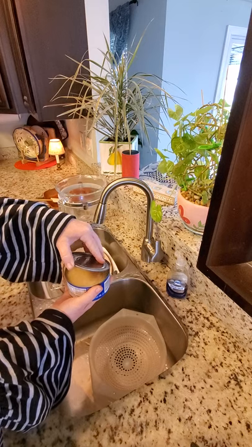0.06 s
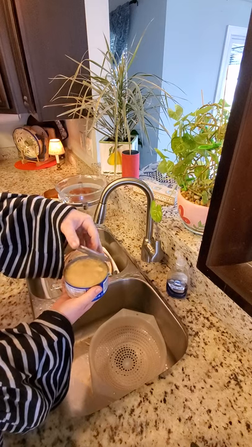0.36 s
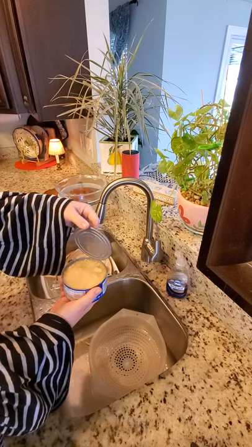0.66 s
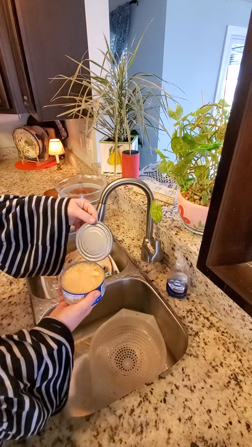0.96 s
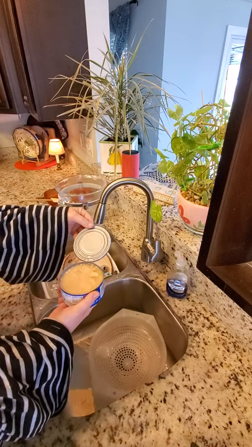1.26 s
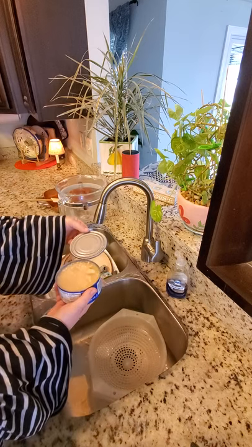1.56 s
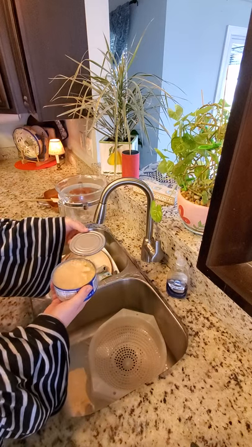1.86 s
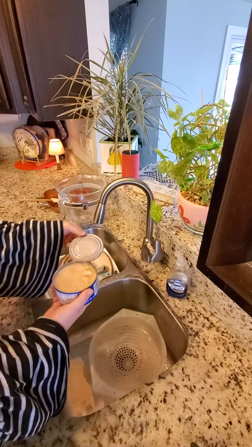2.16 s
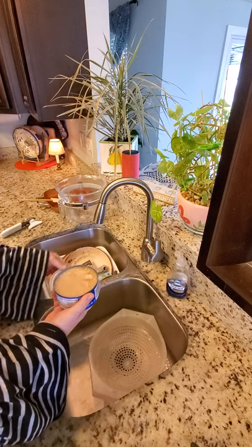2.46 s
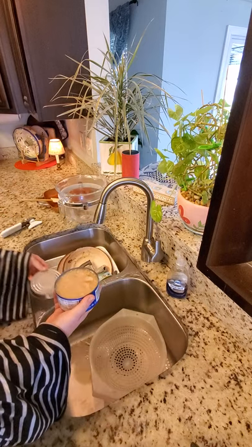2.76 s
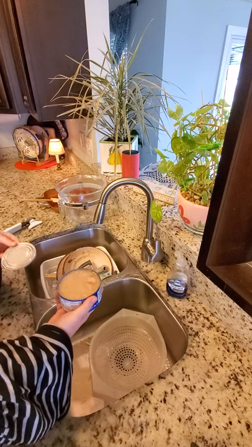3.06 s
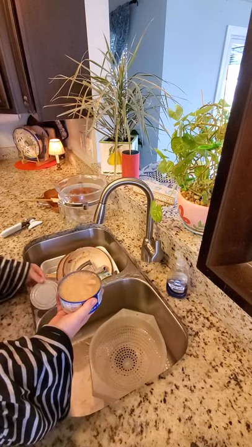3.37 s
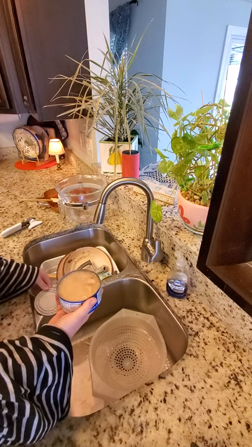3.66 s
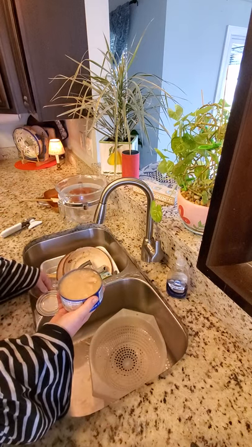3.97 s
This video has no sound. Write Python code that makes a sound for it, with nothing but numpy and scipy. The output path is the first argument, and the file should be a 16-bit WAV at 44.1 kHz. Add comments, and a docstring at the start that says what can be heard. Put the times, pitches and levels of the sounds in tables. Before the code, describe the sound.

A thin metal can lid clinks and rattles briefly into a steel sink.

```python
"""Appliances hum in a quiet kitchen while a thin can lid slides off its can with faint scrapes and ticks.
The scraping is friction noise that gathers at the resonances of the held lid. One hum stops midway.
Lowered into a steel sink, the lid bumps, clinks once and lands with a short rattle: each contact is
a noisy clash of sheet metal over the ringing modes of lid and sink."""
import sys
import numpy as np
from scipy import signal
from scipy.fft import irfft
from scipy.io import wavfile

SR = 44100
rng = np.random.default_rng(int(sys.argv[2]) if len(sys.argv) > 2 else 0)


def store_pcm(level_fs):
    """Save levels as 16-bit WAV."""
    pcm = np.round(np.clip(level_fs, -1, 1) * 32767).astype(np.int16)
    wavfile.write(sys.argv[1], SR, np.atleast_2d(pcm).T)


N = 176400
TOP_HZ = 15900

# Likeness of left and right: freq_hz, correlation
STEREO_LIKENESS = [(60, 1), (150, 0.88), (350, .8), (550, 0.6), (1200, 0), (15000, 0)]
# Kitchen reverb time: freq_hz, t60_s
ROOM_DECAY = [(200, .35), (1500, 0.45), (3000, 0.4), (15000, 0.22)]
# Lid hitting the sink; spot blends from contact point A (0) to B (1), focus is the most excited pitch:
# start_s, ring_db, clash_db, spot, tilt_db_per_octave, focus_hz, focus_lift_db
SINK_HITS = [(3.481, 1, 1, 0.07, -2.5, 1390, 1.5), (3.4941, -14, -16, 0.38, 0, 2300, 6),
             (3.6618, -1, -1.5, 0.87, -1, 1450, 6), (3.6802, -9, -6, 1, 1.5, 4400, -0.5),
             (3.694, -13.5, -5.5, 0.97, 0, 2290, 20.5), (3.711, -17, -11, 0.22, -3, 2320, 16),
             (3.73, -12.5, -14.5, 0.6, -2, 4400, 11.5)]
# Modes of lid and sink: pitch_hz
METAL_PITCHES = [502, 534, 810, 1335, 1438, 1494, 1612, 1685, 1720, 2137, 2388, 2770, 2962, 3016, 3232,
                 3461, 3701, 3765, 4427, 4610, 5202, 5350, 5772, 6148, 6228, 7286, 7383, 9294, 10250, 11650,
                 12488, 14870]
# Stereo lean of the clinks: freq_hz, left_minus_right_db
CLINK_BALANCE = [(200, -0.5), (530, 1), (1500, 3), (2400, 2), (4000, -0.5), (9000, -1.5), (15000, -1.5)]


def amp(db):
    """Decibels to gain."""
    return 10 ** (np.asarray(db) / 20)


def curve(points, hz, column=1):
    """One column of a table, interpolated over log frequency."""
    table = np.array(points, float)
    return np.interp(np.log(hz + 1), np.log(table[:, 0] + 1), table[:, column])


def near(hz, modes_hz, width_hz):
    """1 on a mode, falling towards 0 away from it."""
    distance_hz = abs(hz[:, None] - np.array(modes_hz)).min(1)
    return np.exp(-(distance_hz / width_hz) ** 2)


def bell(hz, centre_hz, octaves):
    """A bell curve over pitch, 1 at its centre."""
    return np.exp(-(np.log2(hz / centre_hz) / octaves) ** 2)


def add(mix, start_s, sound):
    """Mixes in a stereo sound."""
    part = mix[:, round(start_s * SR):][:, :sound.shape[1]]
    part += sound[:, :part.shape[1]]


def pan(db):
    """Left and right gains for a left-minus-right level."""
    return amp(np.array([[db], [-db]]) / 2)


def noise(colour, size):
    """Stereo noise with the spectrum colour(hz) in dB; the bass is nearly mono."""
    hz = np.fft.rfftfreq(size, 1 / SR)
    left, spread = np.exp(2j * np.pi * rng.random((2, len(hz))))
    likeness = np.clip(curve(STEREO_LIKENESS, hz), -1, 1)
    right = likeness * left + np.sqrt(1 - likeness ** 2) * spread
    return irfft(np.array([left, right]) * amp(colour(hz)), size) * np.sqrt(size)


def phase_gap(hz):
    """Radians between left and right, wider for higher tones."""
    return np.arccos(np.clip(curve(STEREO_LIKENESS, hz), -1, 1))


def ring(hz, t60, t):
    """One decaying mode in stereo."""
    return amp(-60 * t / t60) * np.sin(2 * np.pi * hz * t + np.array([[.5], [-.5]]) * phase_gap(hz))


def die_away(x, decay):
    """Lets each band of x fade at its own speed."""
    hz, t, bands = signal.stft(x, SR, nperseg=256)
    bands = bands * amp(-60 * t / curve(decay, hz)[:, None])
    return signal.istft(bands, SR, nperseg=256)[1][:, :x.shape[1]]


def in_room(x, wet_db, size=22050):
    """The sound plus its diffuse kitchen reverb."""
    build_up = np.minimum(np.arange(size) / SR / 0.0078, 1)
    tail = die_away(noise(np.zeros_like, size), ROOM_DECAY) * build_up
    return x + amp(wet_db) * signal.fftconvolve(x, tail / np.linalg.norm(tail[0]), axes=1)[:, :N]


def kitchen_hum(switch_s=1.542, fade_s=0.35):
    """Motors and mains hum over soft air; as one hum stops, some tones sink and others come up."""
    # Tones that run throughout: pitch_hz, level_db
    steady_tones = [(59.2, -73), (81.71, -47.5), (118.4, -72), (147.9, -76.5), (286.1, -75.5), (414.1, -72),
                    (473.3, -75), (651, -82)]
    # Tones that change at the switch: pitch_hz, before_db, after_db
    switched_tones = [(180, -70, -95), (210.4, -73.5, -91.5), (233.1, -70, -86.5), (266.4, -81.5, -73),
                      (325.4, -64, -79.5), (384.4, -82, -72), (503, -93.5, -79), (595, -92.5, -75.5),
                      (627.5, -76.5, -96)]
    # Room air around the switch: freq_hz, before_db, after_db
    air = [(20, -9, -7), (41.7, -5, -8), (87, 3, 4), (124, -6, -11.5), (226, -4, -6.5), (450, -7.5, -9.5),
           (683, -12, -14), (1344, -16.5, -18.5), (2820, -31, -31), (4620, -41.5, -41.5),
           (8000, -54.5, -54), (12200, -47, -47.5), (16000, -44.5, -45.5)]
    t = np.arange(N) / SR
    switched = np.clip((t - switch_s) / fade_s + .5, 0, 1)
    air_before = noise(lambda hz: curve(air, hz), N)
    air_after = noise(lambda hz: curve(air, hz, column=2), N)
    out = amp(-42) * (air_before * np.sqrt(1 - switched) + air_after * np.sqrt(switched))
    for hz, before_db, after_db in [(hz, db, db) for hz, db in steady_tones] + switched_tones:
        waver = signal.resample(rng.standard_normal(24), N) * 0.29 * min(hz / 400, 1) ** 2
        rms = amp(before_db + (after_db - before_db) * switched) * (1 + waver)
        stereo_phase = np.array([[0], [phase_gap(hz) / 2]])
        out += np.sqrt(2) * rms * np.sin(2 * np.pi * (hz * t + rng.random()) + stereo_phase)
    return out * pan(-1.3)


def rim_scrape():
    """The lid drags softly and unevenly along the rim as it comes off."""
    # Swell of the drag: time_s, level_db
    swell = [(0.0, -9), (0.05, -6), (0.12, -7), (0.18, -4), (0.39, -4.5), (0.5, -8), (0.8, -9), (1.0, -19)]
    # Colour of the friction: freq_hz, level_db
    spectrum = [(800, -18), (1800, -3.5), (2900, 5.5), (3600, 1.5), (4300, -4), (6000, -11.5), (8000, -27),
                (16000, -31)]
    grain_db = 2.5 * signal.resample(rng.standard_normal(320), N)
    swell_db = np.interp(np.arange(N) / SR, *np.transpose(swell), right=-100)
    return noise(lambda hz: curve(spectrum, hz), N) * amp(-72 + swell_db + grain_db)


def lid_ticks(size=13230, scrape_t60=0.065):
    """The lid's edge catches on can and fingers; each grip favours and detunes different modes."""
    # Catches of the edge: start_s, level_db, half_rise_s, tilt_db_per_octave, focus_hz, focus_lift_db
    catches = [(.207, -77.5, 0.0047, -6, 4530, 12), (0.226, -77, .005, -7, 3700, 12),
               (0.251, -68.5, .0005, -7.5, 4000, 7), (0.439, -83.5, 0.0062, -10.5, 2670, 9),
               (.571, -75.5, 0.0037, -5.5, 5800, 8), (0.581, -81, 0.016, 1.5, 10000, 6),
               (.622, -83.5, 0.02, -1.5, 9500, 9), (0.665, -75.5, 0.0034, -3, 3100, 8),
               (0.7452, -82.5, .003, -2, 5800, 2), (1.0269, -67.5, .0008, -2.5, 3050, 3.5),
               (1.588, -90, 0.0045, 6, 7600, 19), (1.767, -93, .01, 5, 7360, 10),
               (1.797, -80, 0.012, 3.5, 6400, 8), (1.823, -68, .007, 1, 3070, -1.5),
               (1.974, -84, .005, 2.5, 7800, 19)]
    # Colour of their scraping: freq_hz, level_db
    spectrum = [(500, -12.5), (1400, 7.5), (2000, -4.5), (3000, 0.5), (3700, -11.5), (4500, -14),
                (6500, -15.5), (7600, -18.5), (8600, -23.5), (10000, -7), (12000, -6.5), (15500, -5)]
    # Modes of the lid held in the fingers: pitch_hz, level_db, t60_s
    held_modes = [(3020, -3.5, 0.095), (3600, -16.5, 0.05), (4320, -10, 0.026), (4500, -16, 0.051),
                  (5780, -16.5, 0.052), (6100, -16.5, 0.14), (7350, -13, 0.076), (7840, -17, 0.087),
                  (9280, -8, 0.062), (9950, -10.5, 0.04), (11580, -4.5, 0.14), (12300, -8, .07),
                  (14400, -14, .06)]
    t, out = np.arange(size) / SR, np.zeros((2, N))
    peaks_db = lambda hz: 11.5 * near(hz, [mode[0] for mode in held_modes], width_hz=140)
    for start_s, level_db, half_rise_s, tilt, focus_hz, lift_db in catches:
        def touch_db(hz):
            return tilt * np.log2((hz + 500) / 6000) + lift_db * bell(hz + 1, focus_hz, octaves=.14)

        rise_s = 2 * half_rise_s
        tick = noise(lambda hz: curve(spectrum, hz) + touch_db(hz) + peaks_db(hz), size)
        tick *= amp(5 - 60 * np.maximum(t - rise_s, 0) / scrape_t60)
        for hz, mode_db, t60 in held_modes:
            scatter_db, detune = rng.normal(0, [2, .006])
            hold = amp(-60 * np.maximum(rise_s - t, 0) / t60)  # no decay until the rise ends
            tone = ring(hz * (1 + detune), t60, t - rise_s) * hold
            tick += amp(mode_db + touch_db(hz) + scatter_db) * tone
        add(out, start_s, amp(level_db) * np.minimum(t / rise_s, 1) * tick)
    return in_room(out, wet_db=-7)


def dull_taps(size=13230, rise_s=0.0017):
    """Damped knocks: one broad resonance and a little hiss."""
    # Taps and brushes: start_s, level_db, centre_hz, width_octaves, t60_s, hiss_db
    taps = [(0.2517, -53.5, 1360, 0.3, 0.021, -30), (0.9408, -51, 1440, 0.13, 0.038, -56),
            (3.435, -56, 1380, 0.75, 0.38, -22)]
    t, out = np.arange(size) / SR, np.zeros((2, N))
    for start_s, level_db, centre_hz, width, t60, hiss_db in taps:
        resonance = lambda hz: np.sqrt(bell(hz + 1, centre_hz, width))
        knock = noise(lambda hz: 20 * np.log10(resonance(hz) + amp(hiss_db)), size)
        envelope = amp(level_db - 60 * t / t60) * np.minimum(t / rise_s, 1)
        add(out, start_s, envelope * knock / knock.std())
    return in_room(out, wet_db=-10)


def basin_bump(start_s=3.4375, peak_s=0.0048, size=4410):
    """A soft push on the basin: a few low cycles that swell and die."""
    t, out = np.arange(size) / SR, np.zeros((2, N))
    swell = (t / peak_s * np.exp(1 - t / peak_s)) ** 2
    add(out, start_s, amp(-41) * swell * ring(hz=295, t60=0.91, t=t))
    return in_room(out, wet_db=-10)


def sheet_clash(size=22050, rise_s=0.0012, flex_hz=1447, shimmer_from_hz=3900, count=110):
    """Each hit flexes the lid and sets off a noisy clash with a shimmer of weak upper modes."""
    # Colour of the sheet metal: freq_hz, spot_a_db, spot_b_db
    spectrum = [(100, -34, -20), (185, -18, -3.5), (310, -16.5, -9.5), (500, -10.5, -11), (660, -14.5, -29),
                (1010, -35.5, -23), (1120, -32, -33), (1225, -6, -2.5), (1520, -8.5, -3.5),
                (1705, -5.5, -11.5), (1830, -27, -14), (2270, -28, -27), (2370, -10.5, -2),
                (2830, -15.5, -20.5), (3014, -6.5, -1.5), (3400, -32, -37), (3730, -10, -8.5),
                (3860, -19, -14.5), (4470, -14.5, -16), (4770, -16, -22.5), (5300, -10, -9),
                (5600, -18, -20), (6270, -12, -10), (6450, -15.5, -32), (8600, -13, -20),
                (9700, -15.5, -16), (12300, -10.5, -9.5), (13200, -7, -12), (15500, -7, -12)]
    # Fade of the clash: freq_hz, t60_s
    clash_decay = [(200, 0.14), (1500, 0.18), (4000, 0.2), (15000, 0.04)]
    # Fade of the upper modes: freq_hz, t60_s
    shimmer_decay = [(4000, .24), (7000, 0.27), (15000, 0.11)]
    t, out = np.arange(size) / SR, np.zeros((2, N))
    upper_hz = shimmer_from_hz + (TOP_HZ - shimmer_from_hz) * (np.arange(count) + rng.random(count)) / count
    upper_modes = np.sin(2 * np.pi * (upper_hz[:, None] * t + rng.random((2, count, 1))))
    upper_modes *= amp(-60 * t / curve(shimmer_decay, upper_hz)[:, None])
    upper_db = rng.normal(0, 3, count) - curve(spectrum, upper_hz).mean()
    # The sheet's fine peaks and gaps, shared by all hits
    ripple_hz = np.arange(shimmer_from_hz, TOP_HZ, 70)
    ripple_db = 3 * np.clip(rng.standard_normal(len(ripple_hz)), -2, 1)
    # A few cycles of bending as the edge lands
    flex = amp(-26) * np.exp(-(t / 0.0015 - 2) ** 2) * np.sin(2 * np.pi * flex_hz * t)
    for start_s, _, clash_db, spot, tilt, _, _ in SINK_HITS:
        def sheet_db(hz):
            spot_db = (1 - spot) * curve(spectrum, hz) + spot * curve(spectrum, hz, column=2)
            side_db = np.array([[.5], [-.5]]) * curve(CLINK_BALANCE, hz)
            return spot_db + tilt * np.log2((hz + 100) / 3000) + side_db

        def resonant_db(hz):
            peaks_db = 5 * near(hz, METAL_PITCHES, width_hz=55)
            return sheet_db(hz) + np.interp(hz, ripple_hz, ripple_db, left=0) + peaks_db

        clash = die_away(noise(resonant_db, size), clash_decay)
        clash += amp(-12.5) * die_away(noise(resonant_db, size), ROOM_DECAY)
        shimmer = np.einsum("ck,ckt->ct", amp(sheet_db(upper_hz) + upper_db), upper_modes)
        metal = (amp(-21) * clash + amp(-55.5) * shimmer) * (1 - np.exp(-t / rise_s))
        add(out, start_s, amp(clash_db) * (metal + flex))
    return out


def metal_ring(size=22050, rise_s=0.0024):
    """The strong modes of lid and sink ring on after each hit, weighted by where it lands."""
    # One row for each of METAL_PITCHES: t60_s, spot_a_db, spot_b_db
    modes = [(0.95, -50.5, -76.5), (0.18, -44.5, -34.5), (0.17, -70.5, -45.5), (0.16, -46, -57),
             (0.11, -37.5, -33), (0.35, -37.5, -38.5), (0.12, -37, -53.5), (0.25, -43.5, -54.5),
             (0.37, -61.5, -38.5), (0.14, -61.5, -54), (0.23, -67, -44), (.22, -42, -72), (0.17, -45, -55),
             (0.3, -44, -45.5), (0.15, -68, -64), (0.62, -73, -53), (0.23, -52, -56), (0.13, -51, -41.5),
             (0.27, -64, -50), (.28, -57, -53), (0.17, -62, -50), (0.31, -51, -53), (0.27, -61, -49),
             (0.3, -52, -43), (0.27, -60, -49), (0.29, -50.5, -56.5), (0.12, -54, -65), (0.12, -48, -40),
             (0.26, -54, -52), (0.18, -44.5, -51), (0.15, -58, -38), (0.089, -53, -35)]
    t, out = np.arange(size) / SR, np.zeros((2, N))
    attack = 1 - np.exp(-t / rise_s)
    for start_s, ring_db, _, spot, _, focus_hz, lift_db in SINK_HITS:
        for hz, (t60, a_db, b_db) in zip(METAL_PITCHES, modes):
            spot_db = (1 - spot) * a_db + spot * b_db
            gain = amp(ring_db + spot_db + lift_db * bell(hz, focus_hz, octaves=0.25))
            add(out, start_s, gain * pan(curve(CLINK_BALANCE, hz)) * ring(hz, t60, t) * attack)
    return in_room(out, wet_db=-14)


def scene():
    """Lid, sink and kitchen together."""
    clinks = sheet_clash() + metal_ring()
    return clinks + lid_ticks() + rim_scrape() + dull_taps() + basin_bump() + kitchen_hum()


def record(dry):
    """A steep low-pass trims the highest treble."""
    low_pass = signal.firwin(511, TOP_HZ, window=("kaiser", 9), fs=SR)
    return signal.oaconvolve(dry, low_pass[None], "same")


dry = scene()
out = record(dry)
store_pcm(out)
```